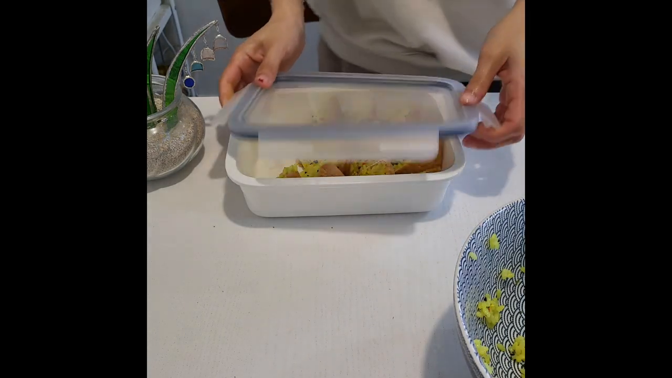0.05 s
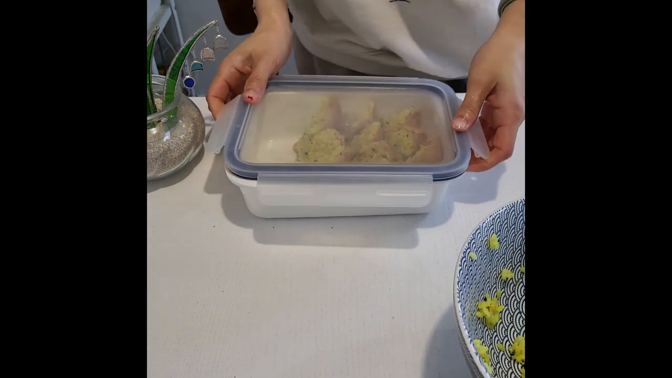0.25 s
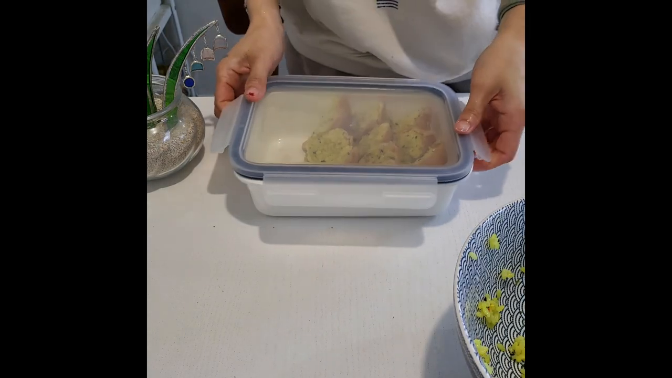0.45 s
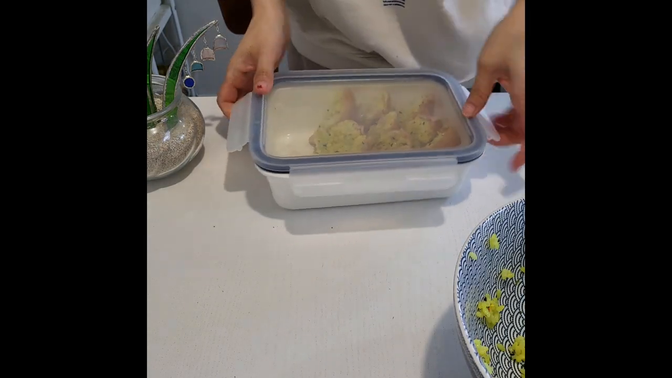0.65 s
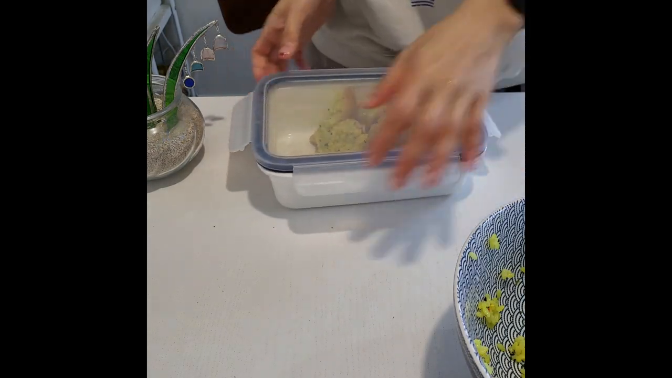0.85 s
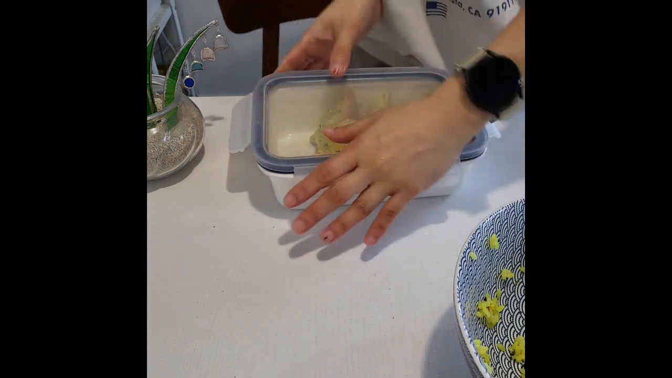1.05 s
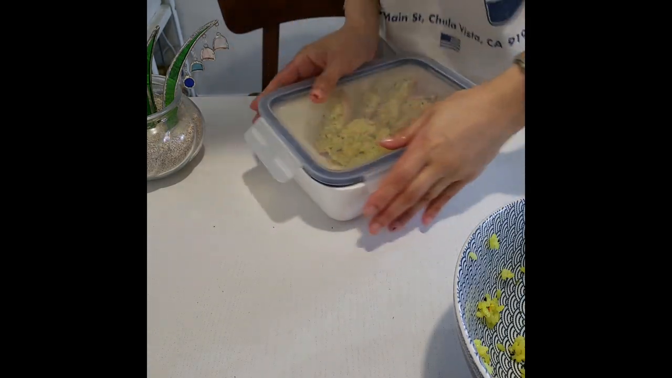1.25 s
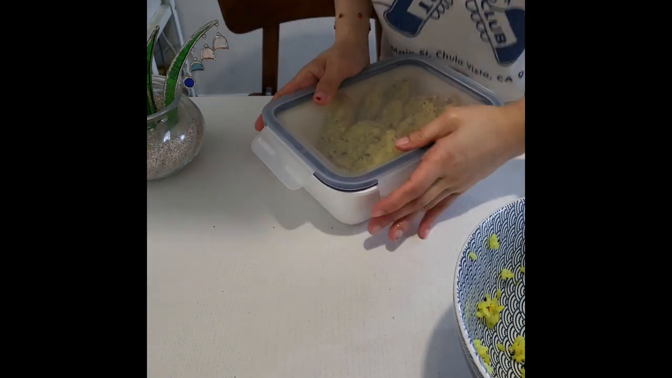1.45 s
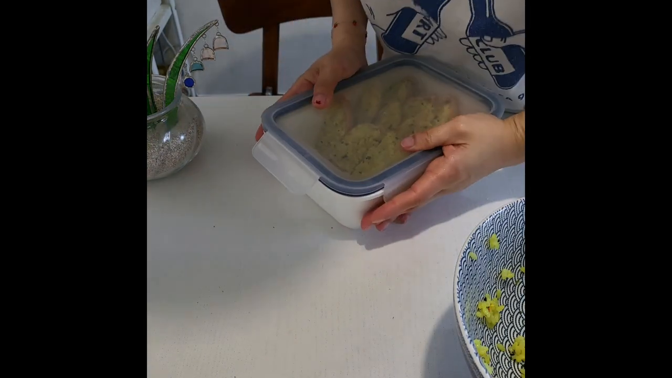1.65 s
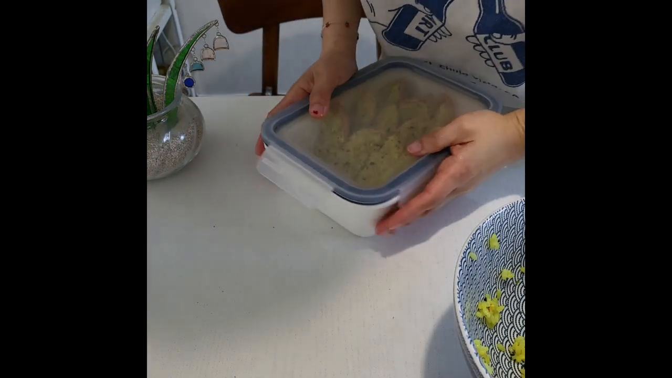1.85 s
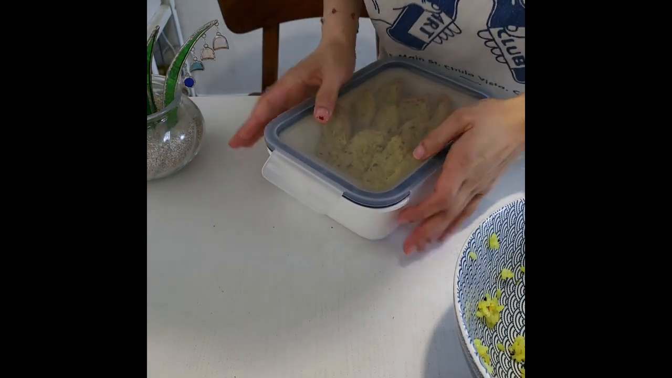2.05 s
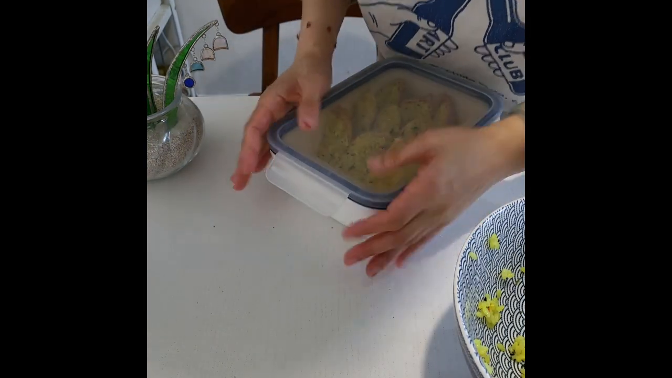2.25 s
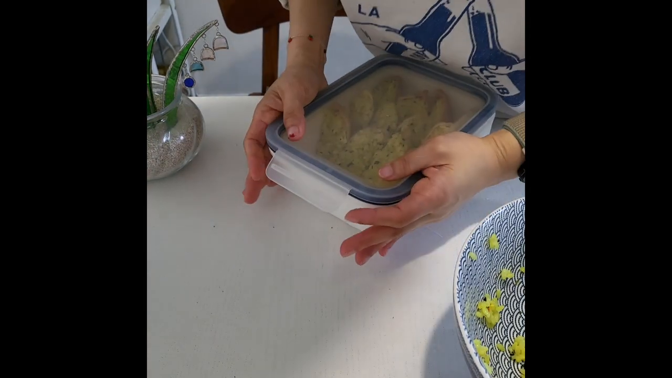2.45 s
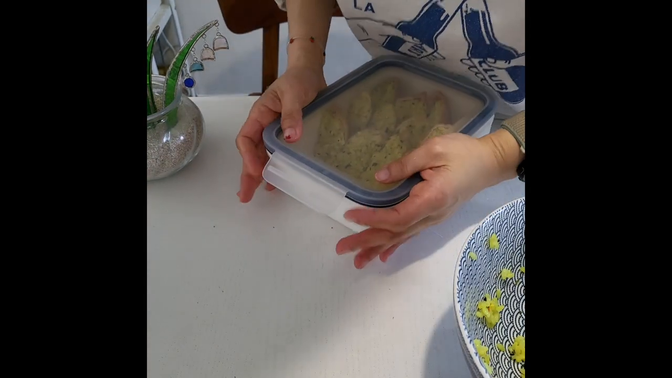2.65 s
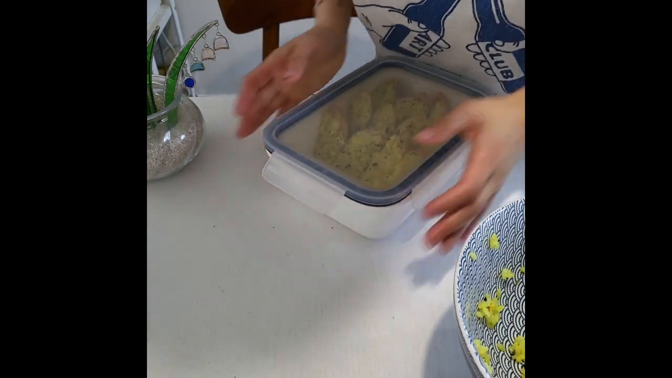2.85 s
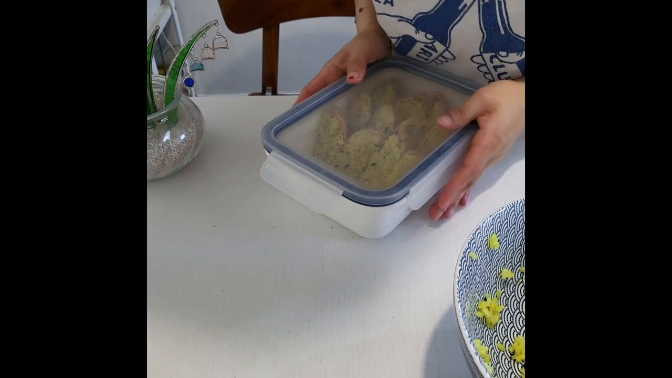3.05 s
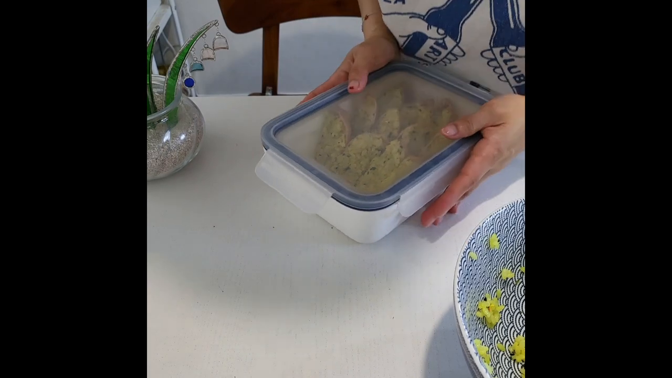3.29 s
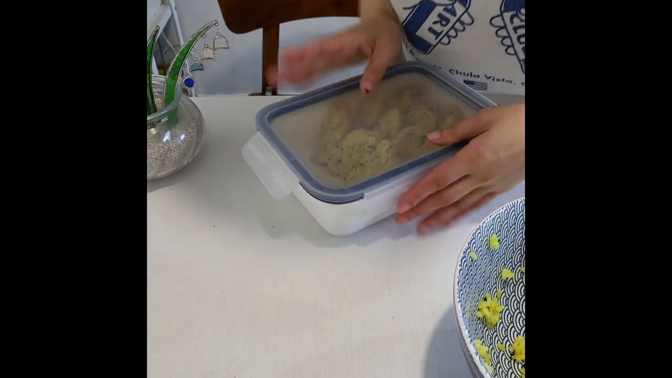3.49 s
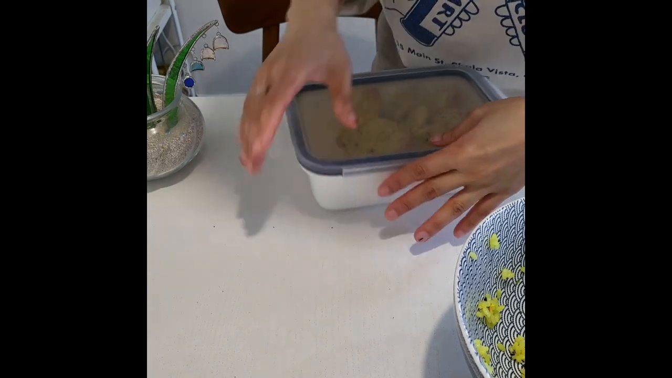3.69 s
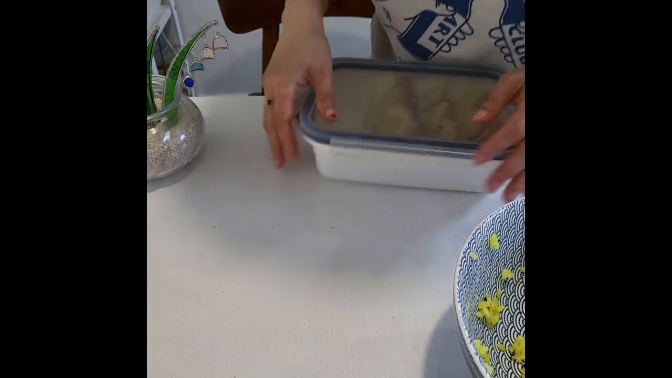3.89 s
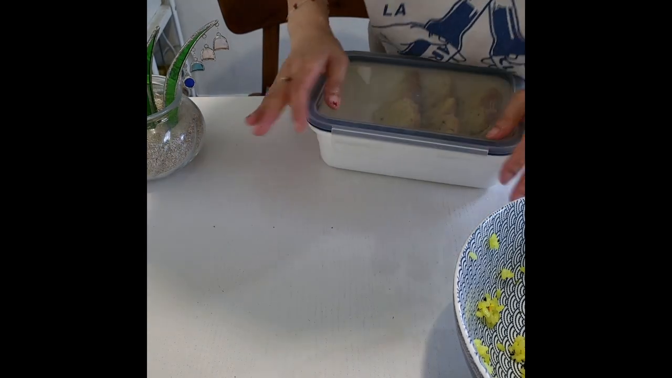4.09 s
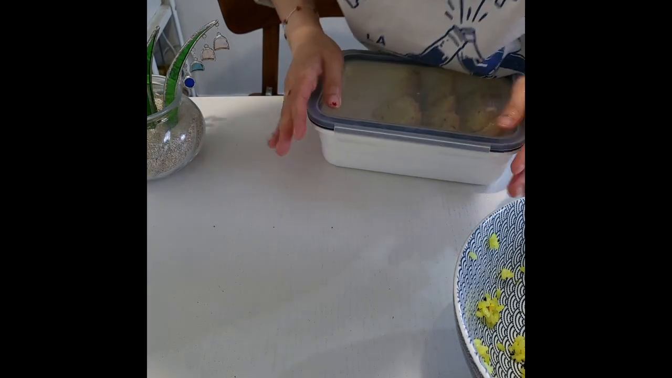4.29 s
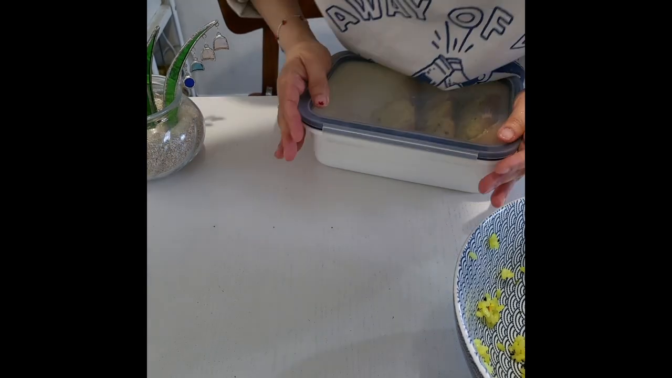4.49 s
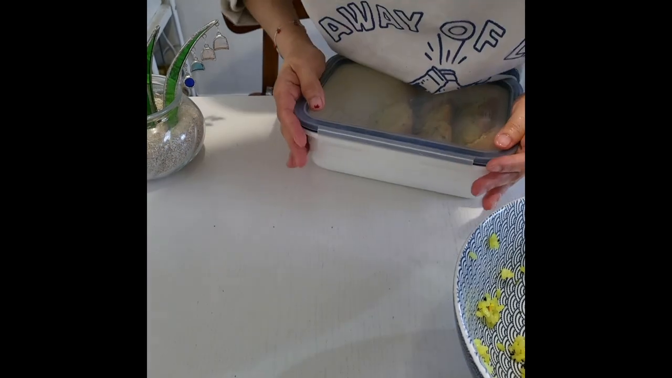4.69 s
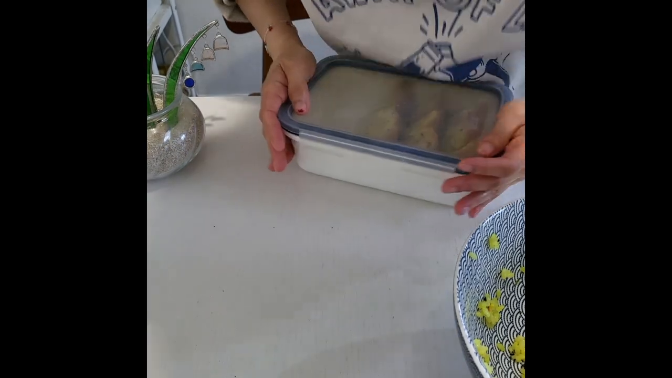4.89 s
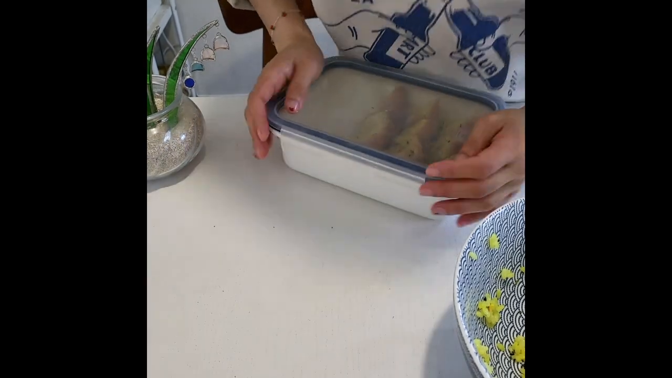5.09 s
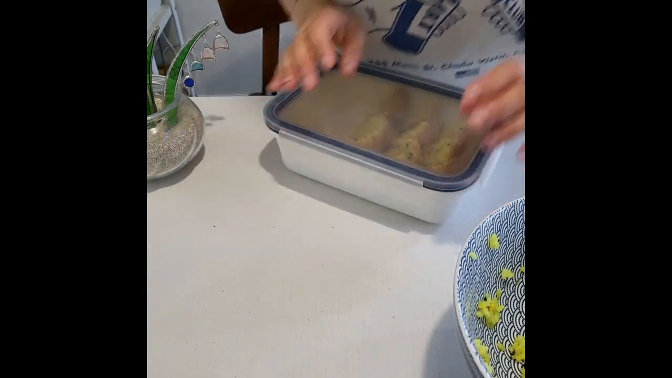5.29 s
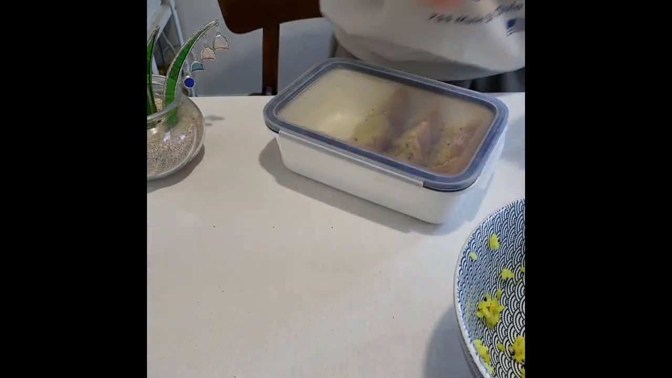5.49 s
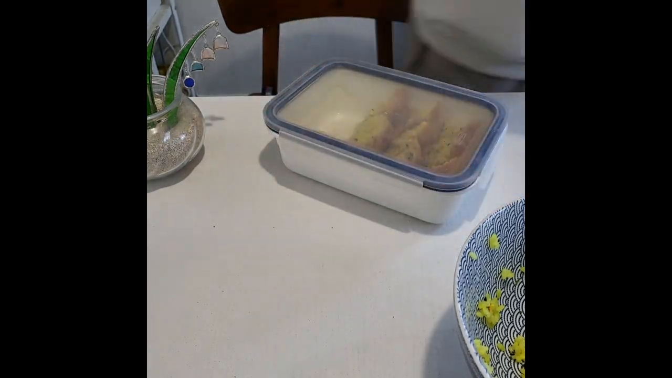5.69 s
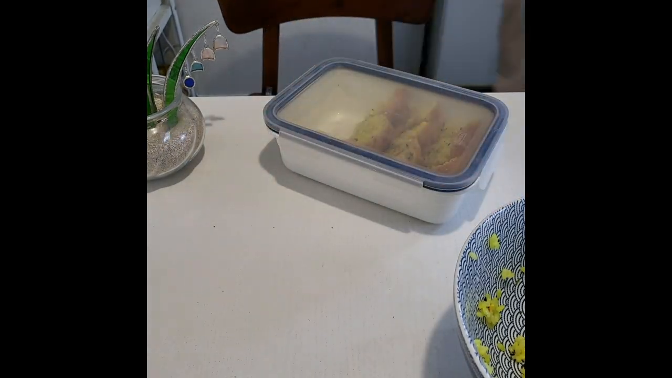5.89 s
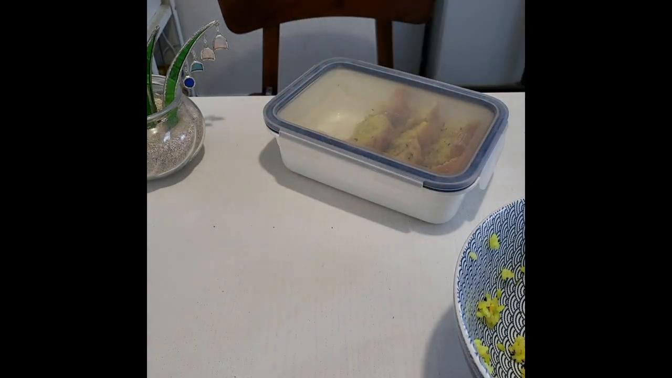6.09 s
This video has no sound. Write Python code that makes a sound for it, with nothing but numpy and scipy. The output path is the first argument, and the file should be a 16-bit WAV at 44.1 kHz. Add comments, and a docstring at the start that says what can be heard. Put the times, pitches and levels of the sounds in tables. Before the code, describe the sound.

A plastic lid clacks onto a food box and its flaps snap shut, with slides and knocks on a kitchen table.

```python
"""A plastic lid drops on a food box on a kitchen table, settles and is patted down.
Two flaps snap shut (1.6 s, 2.4 s), the box is turned, sliding and knocking, and two more snap (4.5 s, 4.7 s).
At 6 s something bumps further off. Each blow on the box clacks the plastic and thumps the table top.
Along the way nails and hinges tick, hands and sleeves brush, a small room answers and an appliance hums.
A phone with two microphone ports listens from close by."""
import sys
import numpy as np
from scipy import signal
from scipy.fft import rfft, irfft
from scipy.io import wavfile
from scipy.ndimage import uniform_filter1d

SR = 44100
rng = np.random.default_rng(int(sys.argv[2]) if len(sys.argv) > 2 else 0)


def inscribe(sig):
    """Save sig as 16-bit PCM at rate SR to the path in sys.argv[1].

    A 1-D sig is mono; a 2-D sig holds one channel per row.
    Samples are clipped to [-1, 1] before scaling.
    """
    pcm = np.round(np.clip(np.atleast_2d(sig).T, -1, 1) * 32767)
    wavfile.write(sys.argv[1], SR, pcm.astype(np.int16))


N = 270774
SIZE = 16384  # samples per event
TIME_S, AGE_S = np.arange(N) / SR, np.arange(SIZE) / SR
BINS_HZ = np.fft.rfftfreq(SIZE, 1 / SR)

# Modes of box and lid. Each row: frequency in Hz, relative level in dB, t60 in seconds.
SHELL_MODES = [(328, 1, 0.35), (601.3, 2.5, 0.19), (733, -8.5, 0.15), (818.3, -2.5, .15), (874, -0.5, 0.12),
               (957, -8.5, 0.14), (1037, -2.5, .12), (1280, -7.5, 0.2), (1417, -8.5, .22), (1563, -7, 0.22),
               (2470, -9.5, .13), (2650, -1, 0.1), (4184, -3, 0.071), (4220, 0, 0.056)]


def latches():
    """Flaps catch and snap over the rim: the box chatters, the hand's push thumps the table."""
    # Each row: start in seconds, relative level in dB, hardness in dB per octave, push on the table in dB,
    # flap resonance in dB, its frequency in Hz.
    snaps = [(1.414, -13, 0.76, 3.5, 3, 944), (1.556, -30, 6, -3, -1, 6400),
             (1.566, -28.5, 6.5, 11.5, 3, 5700), (1.6, -7.5, -3, -4.5, 9, 3240),
             (2.429, -2.5, -1.6, -4, 6.5, 7700), (4.311, -35, 2.5, -5.5, 5.5, 4300),
             (4.335, -32, 1.5, -13, 5, 4300), (4.478, -23, 3.5, 0.5, 0, 4300),
             (4.485, -5, -0.77, -18, 18, 4200), (4.494, -9.5, 0.1, -14.5, 5, 4230),
             (4.569, -21.5, 3, -5, 5, 4440), (4.681, -3.5, 0.84, -14.5, 8.5, 4260)]
    return blows(snaps, clack_db=33, bass_db=-8.5, crack_db=-18, tick_db=-25,
                 thump_db=5.5, thump_hz=290, rise_s=0.0045, box_hz=590, box_db=-17.5, boom_db=-18.5,
                 rattle_db=-1, rattle_t60=0.081, shell_db=-57, lag_s=0.001, wet_db=-2, touch_db=-21.5)


def lid():
    """The loose lid lands, settles on the rim and is patted: light, hollow, quickly still."""
    # Each row: start in seconds, relative level in dB, hardness in dB per octave.
    hits = [(0.020, -17, 0), (0.027, -23, 2), (0.162, -18.5, 4), (0.208, -17.5, 2.5), (0.2145, -15, 0),
            (0.345, -18.5, -1.8), (0.354, -7, -0.04), (1.029, -25, -4)]
    return blows(hits, clack_db=29.5, bass_db=-3.5, crack_db=-20.5, tick_db=-28,
                 thump_db=-6.5, thump_hz=298, rise_s=0.0038, box_hz=460, box_db=-2.5, boom_db=-29,
                 rattle_db=-2, rattle_t60=0.027, shell_db=-47.5, lag_s=0.00088, wet_db=-3.5, touch_db=-17)


def knocks():
    """The heavy base tips onto the table as it is turned: mostly thump, a small clack."""
    # Each row: start in seconds, relative level in dB, hardness in dB per octave.
    hits = [(2.018, -32, -1), (2.187, -33.5, -2), (2.276, -24, 1.4), (2.835, -34.5, -0.5),
            (3.037, -46.5, 4), (3.06, -45.5, -1.5), (3.185, -54, -5.5), (3.351, -56.5, -4.5),
            (3.439, -24.5, 0.5), (3.643, -36.5, -1), (3.779, -21.5, 0.46), (3.898, -39.5, -4),
            (3.956, -26.5, -0.6), (4.035, -23, 0.7), (4.154, -25, 0.4), (4.194, -19, 0.84),
            (4.455, -34, -0.5), (4.970, -31.5, -1.2)]
    return blows(hits, clack_db=32.5, bass_db=3, crack_db=-19, tick_db=-26,
                 thump_db=12.3, thump_hz=287, rise_s=0.005, box_hz=563.6, box_db=-10, boom_db=-26,
                 rattle_db=-1, rattle_t60=0.027, shell_db=-53.5, lag_s=0.001, wet_db=-1.5, touch_db=-17.5)


def blows(hits, clack_db, bass_db, crack_db, tick_db, thump_db, thump_hz, rise_s, box_hz, box_db,
          boom_db, rattle_db, rattle_t60, shell_db, lag_s, wet_db, touch_db,
          touch_s=0.0022, grip_spread=0.04, flap_half_width_hz=600):
    """Each blow clacks the plastic and thumps the table. Returns stereo direct sound and room send."""
    # Lowest mode of the table top. One row: frequency in Hz, relative level in dB, t60 in seconds.
    table_mode = [(146, -1, 0.033)]
    boom = undb(boom_db) * ring(table_mode)
    octaves = np.log2(np.clip(BINS_HZ, 560, 7500) / 560)  # hardness tilts this band: hard is bright
    direct, send = np.zeros((2, 2, N))
    for start_s, db, hardness, *latch in hits:
        push_db, flap_db, flap_hz = latch or (0, 0, 0)
        bending_db = flap_db / (1 + ((BINS_HZ - flap_hz) / flap_half_width_hz) ** 2)
        colour_db = contour([(200, bass_db + push_db), (750, 0.0095), (2600, crack_db), (8000, tick_db)])
        colour_db = colour_db + hardness * octaves + bending_db
        plastic = undb(clack_db) * clack(colour_db, rattle_db, rattle_t60, shell_db)
        stiffness = 1 + grip_spread * rng.uniform(-0.91, 1)  # firmer grip: higher, shorter thump
        thud = undb(thump_db + push_db) * thump(thump_hz * stiffness, rise_s / stiffness, box_hz, box_db)
        sound = undb(db) * (plastic + thud)
        hit_s = start_s + lag_s
        add(direct, hit_s - touch_s / stiffness, undb(db + touch_db) * plastic)  # one edge touches first
        add(direct, hit_s, sound + undb(db) * boom)
        add(send, hit_s, sound * undb(wet_db))
    return np.array([direct, send])


def clack(colour_db, rattle_db, rattle_t60, shell_db, scrape_db=-5, scrape_t60=0.0061):
    """Sharp contact on plastic: chatter, a brief scrape and the shell's modes."""
    # Spectrum of a blow on plastic. Each row: frequency in Hz, relative level in dB.
    spectrum = [(40, -22.5), (130, -4), (280, 3), (480, 2.5), (720, -1.5), (1100, -5), (1600, -5),
                (2500, -4.5), (3400, -7), (4300, -9.5), (5400, -14.5), (7500, -13), (11000, -23),
                (16000, -31)]
    contact = undb(rattle_db) * scatter(burst(0.0011, rattle_t60), passes=1)
    contact += undb(scrape_db) * scatter(burst(0.00029, scrape_t60), passes=1)
    modes = [(hz, db + 2 * rng.standard_normal(), t60) for hz, db, t60 in SHELL_MODES]
    contact += undb(shell_db) * ring(modes)
    contact[:, 0] += 1  # the impact itself
    return -irfft(rfft(contact) * minimum_phase(contour(spectrum) + colour_db))


def thump(hz, rise_s, box_hz, box_db, box_t60=0.038, overtone_ratio=2.6, overtone_db=-13):
    """The loaded table top swings up and dies within a few cycles; the hollow box rings above it."""
    swell = (AGE_S / rise_s * np.exp(1 - AGE_S / rise_s)) ** 3
    pitch_hz = box_hz * rng.uniform(0.928, 1.06)  # shifted by the grip
    box = ring([(pitch_hz, box_db, box_t60),
                (pitch_hz * overtone_ratio, box_db + overtone_db, box_t60 / 2)])
    return box - np.sin(2 * np.pi * hz * AGE_S) * swell


def radiate(x, corner_hz=115):
    """Box and table are too small to push much air in the deep bass."""
    return signal.sosfilt(signal.butter(2, corner_hz, "high", fs=SR, output="sos"), x)


def rubbing(slide_db=-1, brush_db=3, shell_db=-6, slip_db=2, patchy_db=1):
    """Lid and base slip unevenly; hands and sleeves brush past and set the shell ringing."""
    # Lid on rim, base on table. Each row: middle in seconds, length in seconds, relative level in dB.
    slides = [(0.07, 0.61, -45), (0.32, 0.33, -43.5), (0.6, 0.26, -46.5), (1.15, 0.24, -42.5),
              (1.258, 0.12, -33), (1.405, 0.044, -36), (1.94, 0.25, -52), (3.6, 0.45, -51.5),
              (3.88, 0.44, -43.5), (4.43, 0.12, -48.5), (4.88, 0.46, -49.5)]
    # Hands and sleeves on the lid. Each row: middle in seconds, length in seconds, relative level in dB.
    brushes = [(0.07, 0.38, -64), (0.31, 0.2, -62.5), (0.59, 0.26, -61), (1.19, 0.2, -51.5),
               (1.32, 0.05, -62.5), (1.4, 0.074, -64), (2.02, 0.257, -73), (3.6, 0.51, -73.5),
               (3.87, 0.25, -62), (4.41, 0.13, -67), (4.92, 0.206, -78.5), (5.68, 0.26, -82.5),
               (6.01, 0.18, -61.5)]
    # Low hum of the sliding box. Each row: frequency in Hz, relative level in dB.
    slide_spectrum = [(71, -45.5), (120, -9.5), (145, -9), (178, -16), (327, -2), (412, -14.5), (485, -8.5),
                      (544, -19.5), (610, -11), (684, -13.5), (928, -28), (1620, -32), (2500, -37.5),
                      (3250, -65), (5500, -120)]
    # Skin and cloth on plastic. Each row: frequency in Hz, relative level in dB.
    brush_spectrum = [(590, -23.5), (1000, -5), (1180, -8), (1610, 0), (2080, -12.5), (3800, -7.5),
                      (4170, -12.5), (6110, -17), (7700, -14.5), (8960, -23.5), (10900, -21.5),
                      (15100, -33.5), (16000, -39.5)]
    shell = unit(irfft(diffuse(N) * rfft(ring(SHELL_MODES), N), N))
    sliding = strokes(slides) * undb(slide_db + slip_db * wander(70)) * noise(slide_spectrum)
    brush_gain = strokes(brushes) * undb(brush_db + patchy_db * wander(74))
    return sliding + brush_gain * (noise(brush_spectrum) + undb(shell_db) * shell)


def strokes(moves, end_drop_db=11.5, roundness=1.85):
    """Friction swells and falls as each hand movement speeds up and slows."""
    return sum(undb(db - end_drop_db * abs(2 * (TIME_S - middle_s) / length_s) ** roundness)
               for middle_s, length_s, db in moves)


def ticks(gain_db=23, click_db=-4, scratch_t60=0.012, q=4):
    """Tiny scratches of nail and hinge, each with one high resonance."""
    # Each row: start in seconds, relative level in dB, resonance in Hz.
    scratches = [(1.874, -42, 7000), (1.95, -47.5, 3080), (2.2586, -47.5, 4640), (3.3088, -53.5, 7000),
                 (4.419, -48, 4000), (4.937, -45.5, 3800)]
    track = np.zeros((2, N))
    bins_hz = BINS_HZ + 1
    for start_s, db, hz in scratches:
        resonance = 1 / (1 + 1j * q * (bins_hz / hz - hz / bins_hz))
        contact = undb(click_db) + rfft(scatter(burst(0.0015, scratch_t60), passes=1))
        add(track, start_s, undb(db + gain_db) * irfft(contact * resonance))
    return track


def bump(gain_db=30):
    """Something is nudged further off: a dull pulse, heard through the room."""
    # Each row: start in seconds, relative level in dB.
    nudges = [(6.007, -33), (6.014, -40)]
    colour_db = contour([(50, 20), (150, 7.5), (300, 23), (700, 7), (2500, -6.5), (6000, -22),
                         (15000, -26)])
    pulse = irfft(minimum_phase(colour_db))
    track = np.zeros(N)
    for start_s, db in nudges:
        add(track, start_s, undb(db + gain_db) * pulse)
    return track


def kitchen(send, early_s=0.0082, early_t60=0.14, late_s=0.022):
    """Near surfaces reflect first, a diffuse tail follows, low standing waves ring on."""
    # Each row: band in Hz, early reflections in dB, late tail in dB, tail t60 in seconds.
    bands = [(55, -2.5, -2.5, 0.64), (95.3, -17, -14.5, 0.92), (149, -7, -6.5, 0.15),
             (301, -10, -17.5, 0.28), (615, -4, -5.5, 0.27), (1208, -1, -4.5, 0.31),
             (2570, -2.5, -7.5, 0.37), (4490, -4, -4.5, 0.28), (8260, -2.5, -9.5, 0.41),
             (14940, -5, -9.5, .3)]
    # Waves between the walls. Each row: frequency in Hz, level in dB, t60 in seconds.
    standing_waves = [(140.3, -49, 0.49), (224.4, -63, 0.4)]
    early = rfft(scatter(burst(early_s, early_t60)))
    response = ring(standing_waves)
    for band_hz, early_db, late_db, t60 in bands:
        share = contour([(hz, hz == band_hz) for hz, *_ in bands])  # 1 here, 0 at the next bands
        late = rfft(scatter(burst(late_s, t60)))
        response = response + irfft(undb(early_db) * early * share + undb(late_db) * late * np.sqrt(share))
    taper = np.minimum((AGE_S[-1] - AGE_S) * 10, 1) ** 2
    return signal.fftconvolve(send, response * taper, axes=1)[:, :N]


def ambience(rumble_db=-51.5, hum_db=-3, waver_db=2):
    """Low room rumble and the wavering hum of an appliance."""
    # The quiet kitchen. Each row: frequency in Hz, relative level in dB.
    spectrum = [(20, -29), (36, -16.5), (55, -2.5), (86, -24.5), (150, -20), (193, -27), (357, -30),
                (399, -22.5), (434, -39), (542, -37), (1260, -49), (1910, -53), (4060, -60.5),
                (5300, -53.5), (10500, -57), (15500, -73)]
    # Each row: frequency in Hz, relative level in dB.
    hum_tones = [(48.4, -64), (140.0, -66), (258.4, -64), (393.0, -76)]
    hum = sum(undb(db + hum_db + waver_db * wander(18)) * np.sin(2 * np.pi * hz * TIME_S + wander(7.7))
              for hz, db in hum_tones)
    return undb(rumble_db) * noise(spectrum) + hum


def undb(db):
    """Decibels to gain."""
    return 10 ** (np.asarray(db) / 20)


def unit(x):
    """Scale to rms 1."""
    return x / np.sqrt(np.mean(x ** 2))


def fade(t60):
    """Exponential decay of 60 dB in t60 seconds."""
    return np.exp(-np.log(1000) * AGE_S / t60)


def ring(modes):
    """Sum of decaying (Hz, dB, t60) modes."""
    return sum(undb(db) * np.sin(2 * np.pi * hz * AGE_S) * fade(t60) for hz, db, t60 in modes)


def burst(onset_s, t60):
    """Decaying envelope of unit energy, setting in softly around onset_s."""
    shape = fade(t60) * (1 - np.exp(-(AGE_S / onset_s) ** 4))
    return shape / np.sqrt(np.sum(shape ** 2))


def contour(points, size=SIZE):
    """(Hz, value) points joined on a log axis, one value per FFT bin."""
    hz, values = np.transpose(points)
    return np.interp(np.log(np.fft.rfftfreq(size, 1 / SR) + 1), np.log(hz), values)


def minimum_phase(db):
    """Frequency response with the given gains: sharp attack, then decay."""
    cepstrum = irfft(np.log(undb(db)))
    cepstrum[1:SIZE // 2] *= 2
    cepstrum[SIZE // 2 + 1:] = 0
    return np.exp(rfft(cepstrum))


def diffuse(size, alike_hz=1000, bass_likeness=0.85):
    """Spectra of white noise from all sides at two ports: alike in the bass, unrelated in the treble."""
    likeness = bass_likeness * np.sinc(np.fft.rfftfreq(size, 1 / SR) / alike_hz)
    mid, side = np.exp(2j * np.pi * rng.random((2, size // 2 + 1))) * np.sqrt(size / 2)
    return mid * np.sqrt(1 + likeness) + np.array([[1], [-1]]) * side * np.sqrt(1 - likeness)


def scatter(envelope, smooth_bins=41, passes=3):
    """Dense stereo reflections under an envelope; each pass flattens their spectrum."""
    grain = irfft(diffuse(SIZE))
    for _ in range(passes):
        power = np.mean(abs(rfft(grain * envelope)) ** 2, axis=0)
        grain = irfft(rfft(grain) / np.sqrt(uniform_filter1d(power, smooth_bins)))
    return grain * envelope


def noise(spectrum):
    """Coloured stereo noise, rms 1."""
    return unit(irfft(diffuse(N) * undb(contour(spectrum, N)), N))


def wander(rate_hz):
    """Smooth random drift, rms 1."""
    hold = int(SR / rate_hz)
    steps = np.repeat(rng.standard_normal(N // hold + 1), hold)
    return unit(uniform_filter1d(steps, hold)[:N])


def add(track, start_s, sound):
    """Mix one event into a track."""
    i = max(int(start_s * SR), 0)
    track[..., i:i + SIZE] += sound[..., :N - i]


def scene(port_lag_s=0.00017):
    """Blows reach the nearer, left port first; room, rubbing and hum surround them."""
    direct, send = radiate(lid() + latches() + knocks()) + ticks()
    ports = np.array([direct[0], np.roll(direct[1], round(port_lag_s * SR))])
    return ports + kitchen(send + bump()) + rubbing() + ambience()


def record(dry, low_cut_hz=32, top_hz=15900):
    """The phone thins the deepest bass, clips at full scale and cuts the top."""
    thinned = signal.sosfilt(signal.butter(3, low_cut_hz, "high", fs=SR, output="sos"), dry)
    return signal.sosfilt(signal.ellip(10, 0.1, 80, top_hz, fs=SR, output="sos"), np.clip(thinned, -1, 1))


dry = scene()
out = record(dry)
inscribe(out)
```